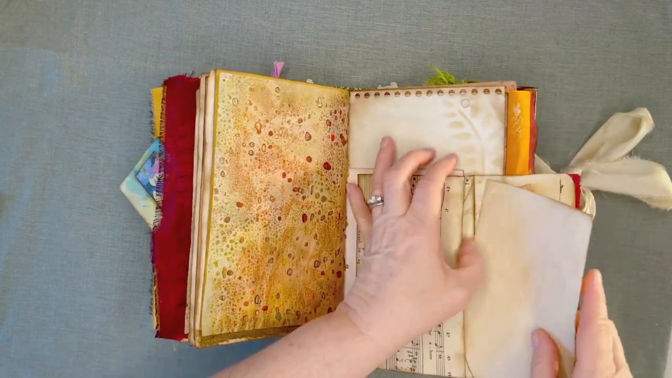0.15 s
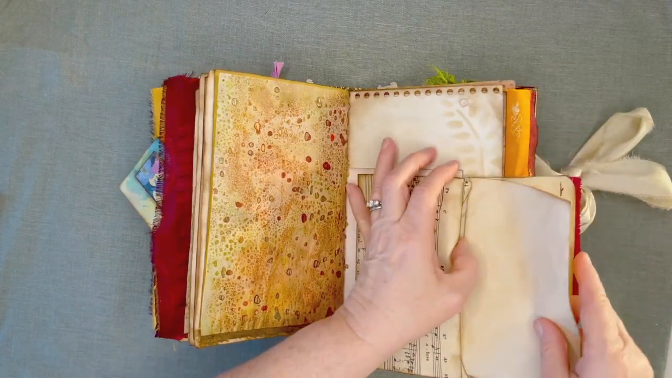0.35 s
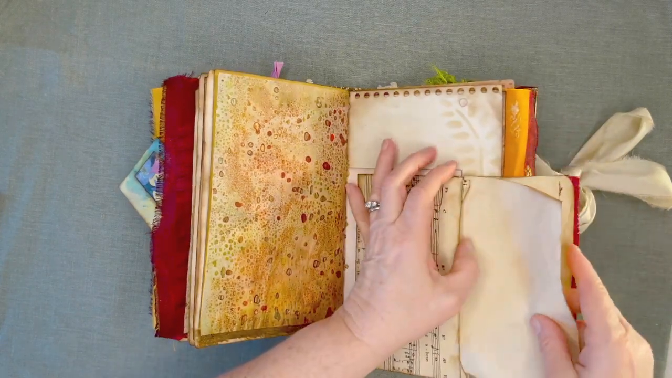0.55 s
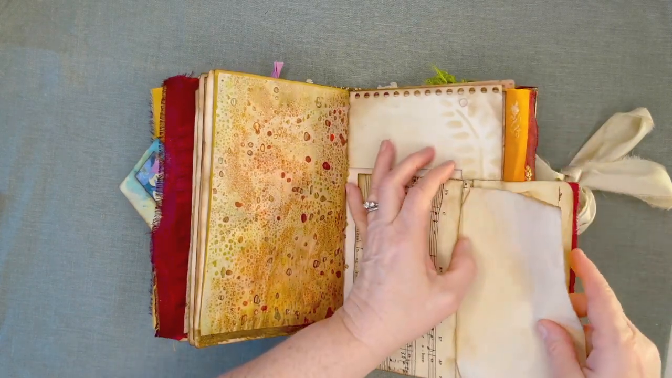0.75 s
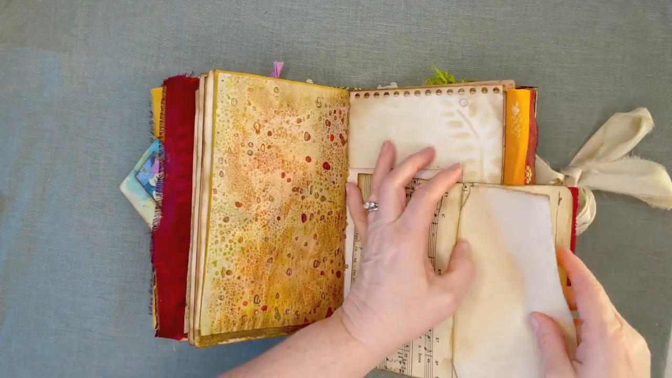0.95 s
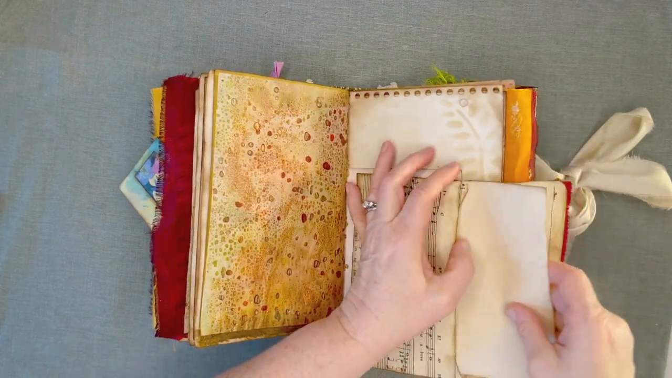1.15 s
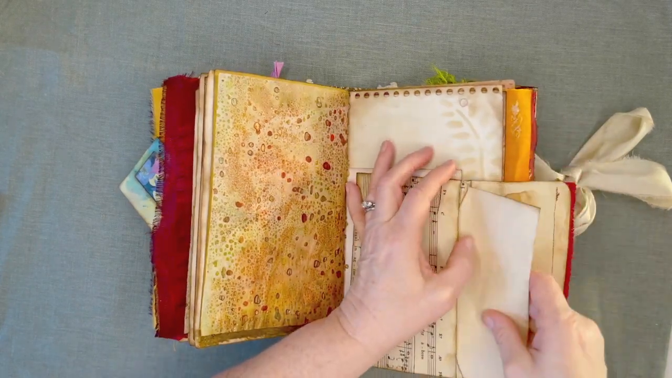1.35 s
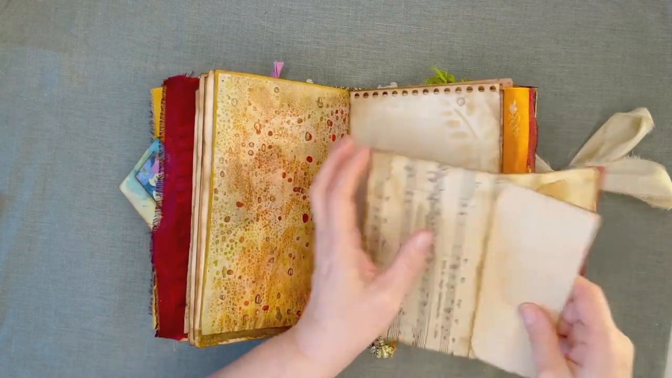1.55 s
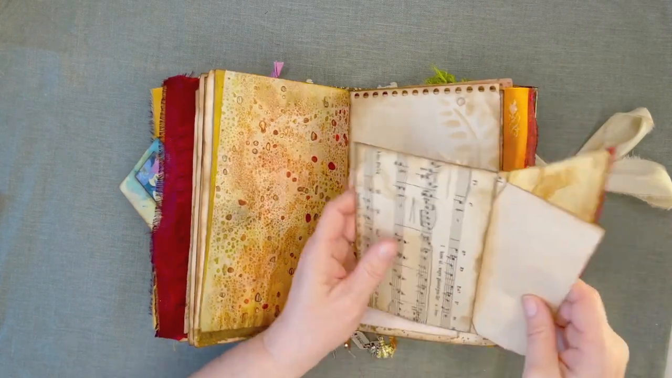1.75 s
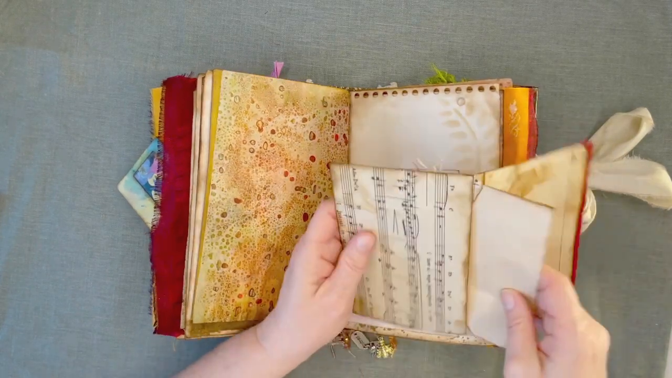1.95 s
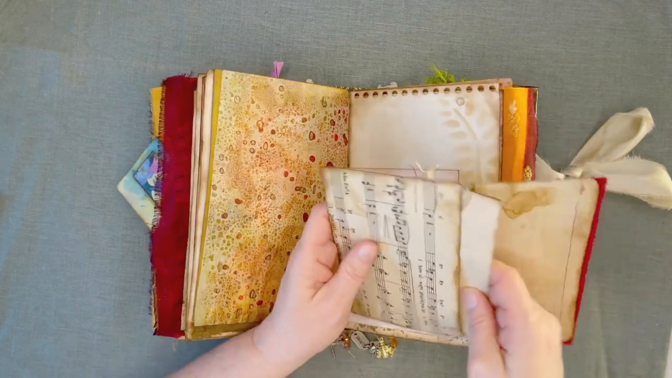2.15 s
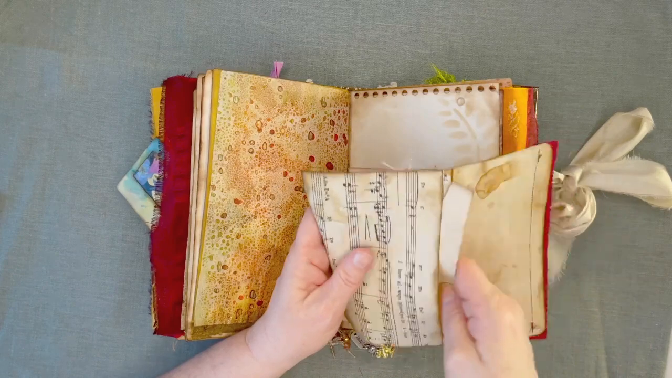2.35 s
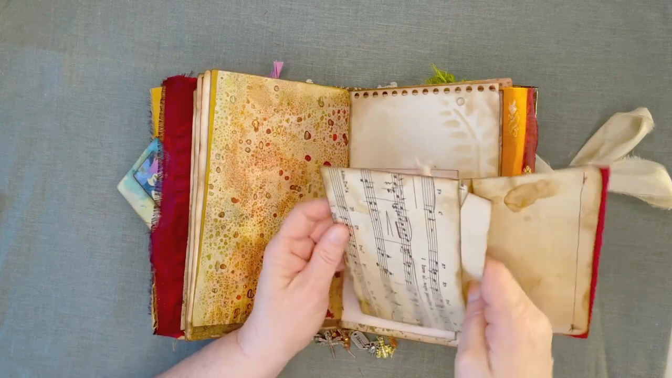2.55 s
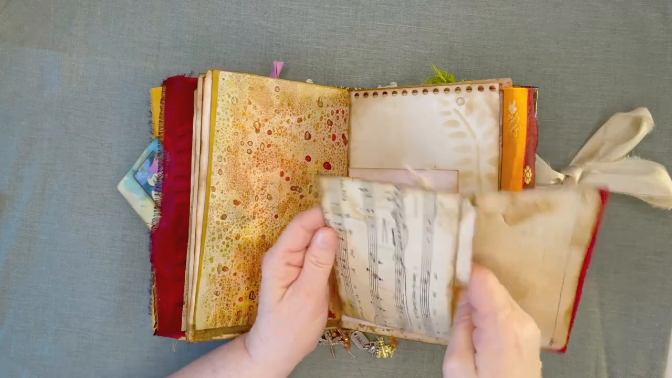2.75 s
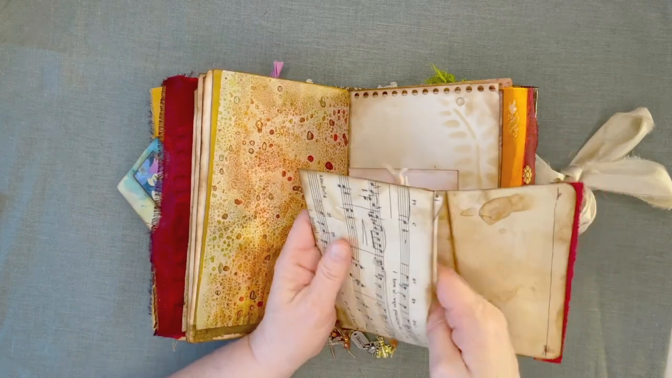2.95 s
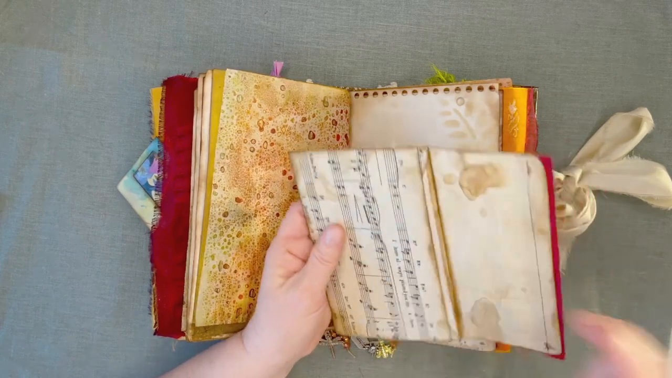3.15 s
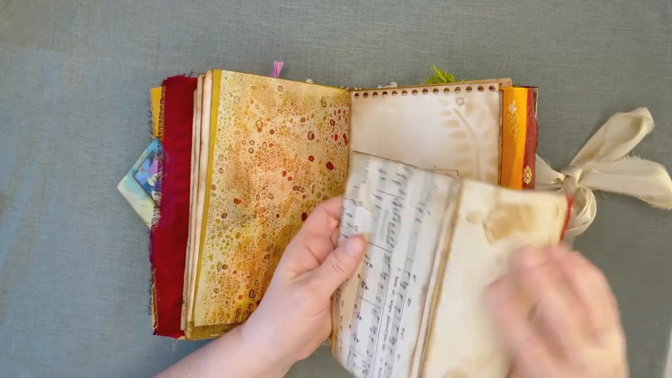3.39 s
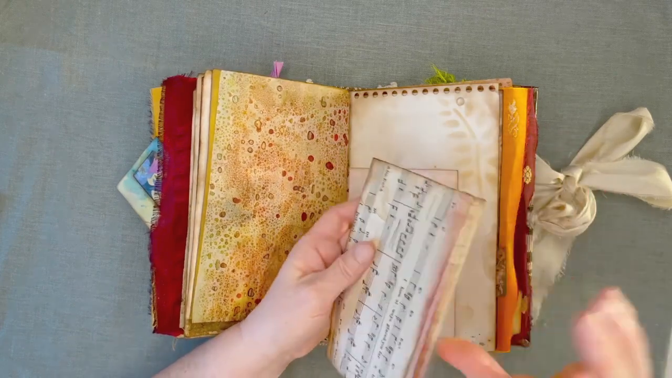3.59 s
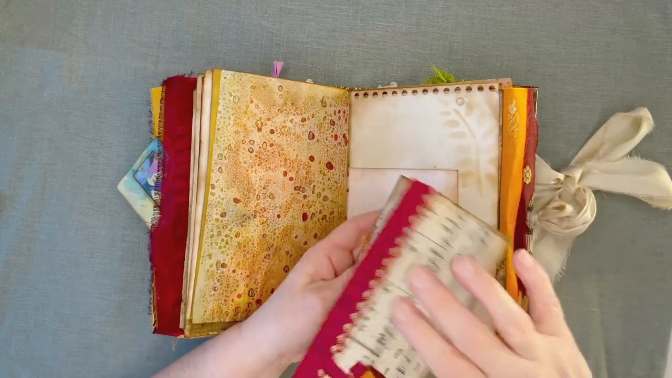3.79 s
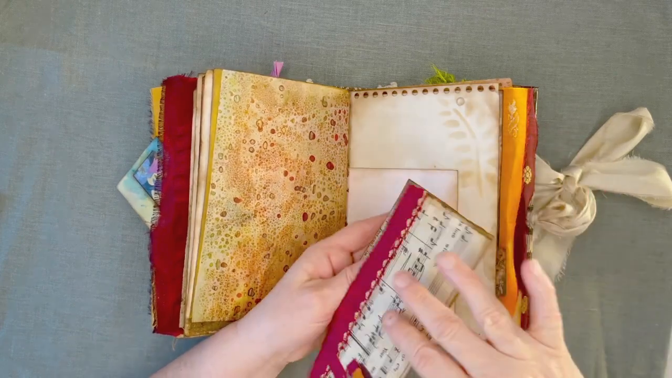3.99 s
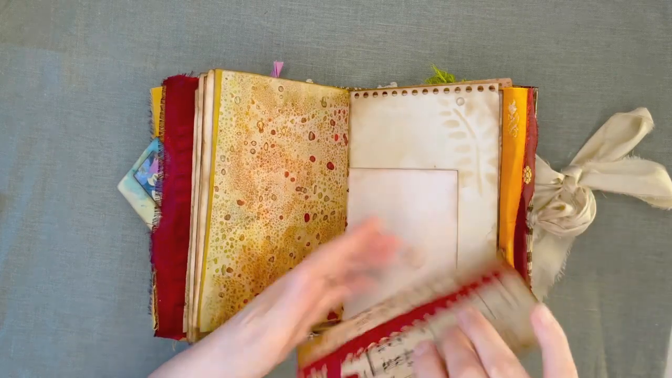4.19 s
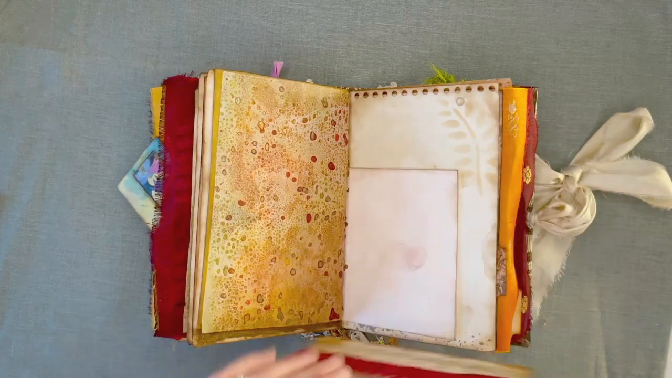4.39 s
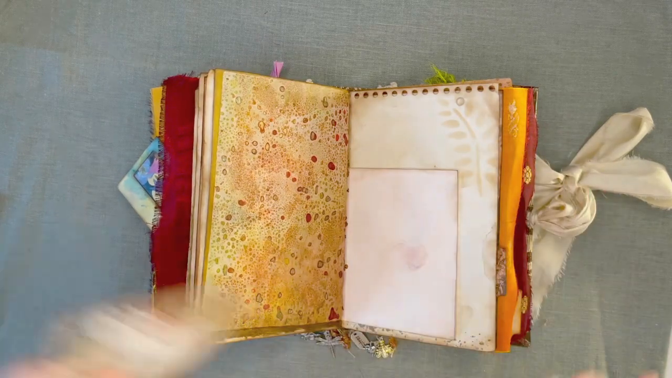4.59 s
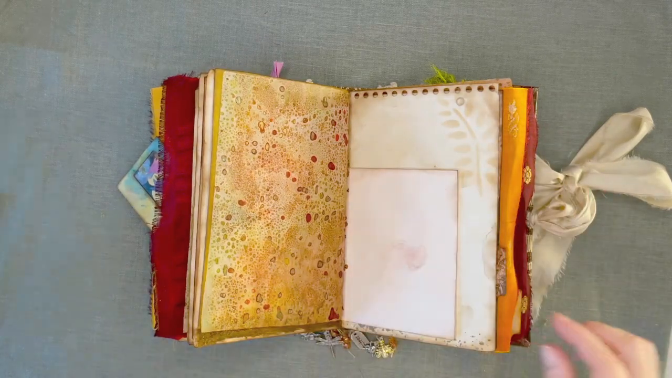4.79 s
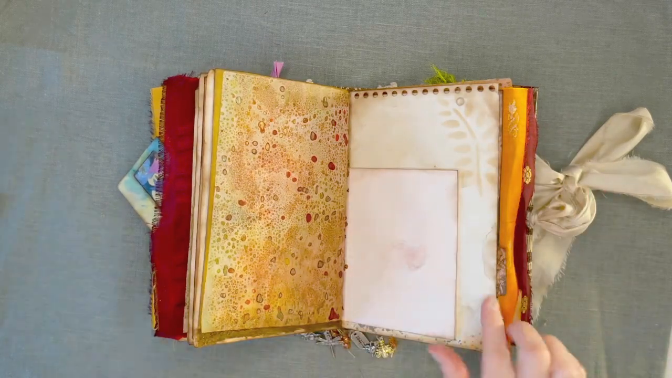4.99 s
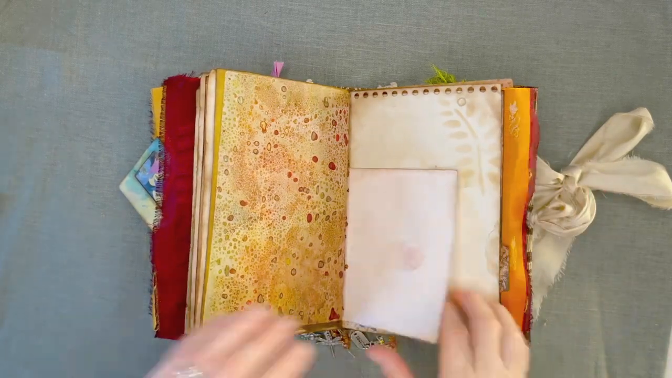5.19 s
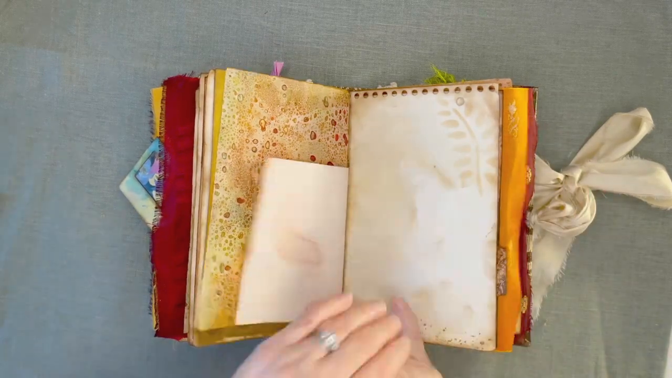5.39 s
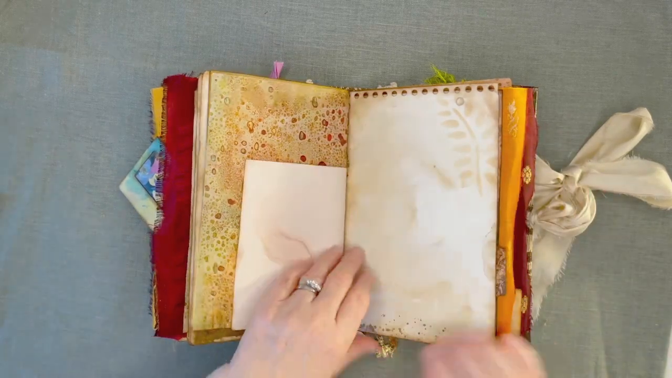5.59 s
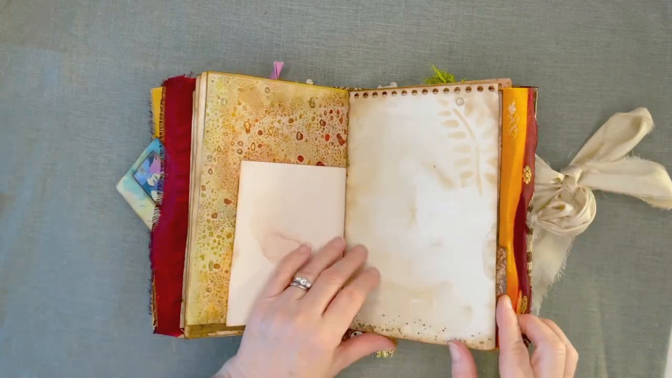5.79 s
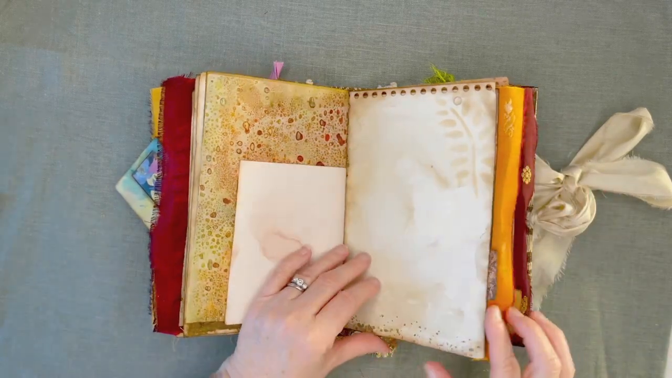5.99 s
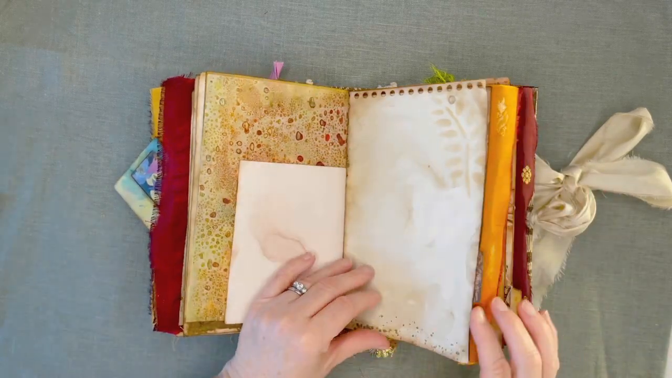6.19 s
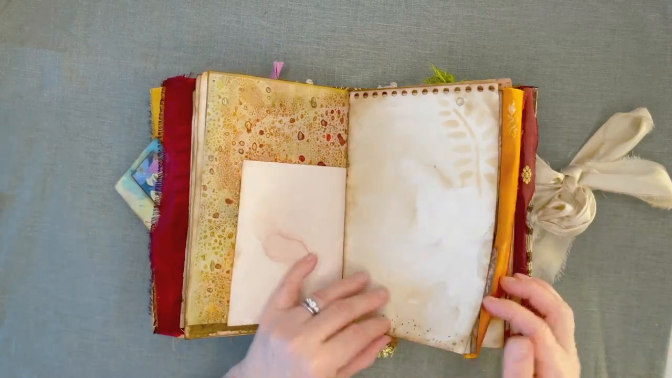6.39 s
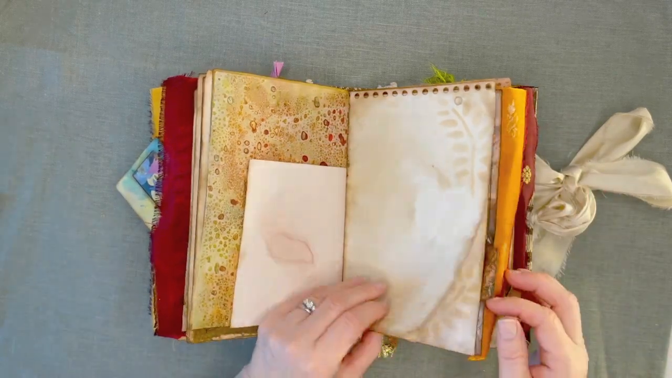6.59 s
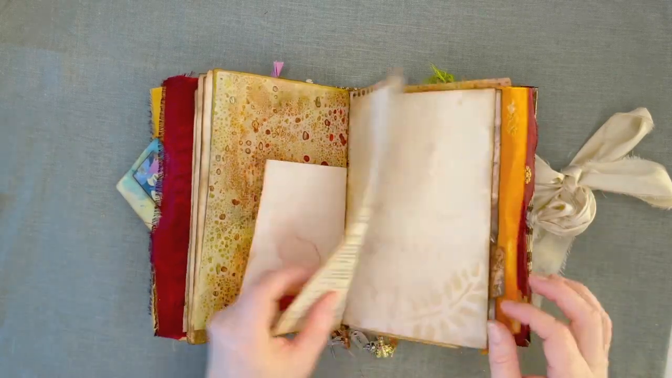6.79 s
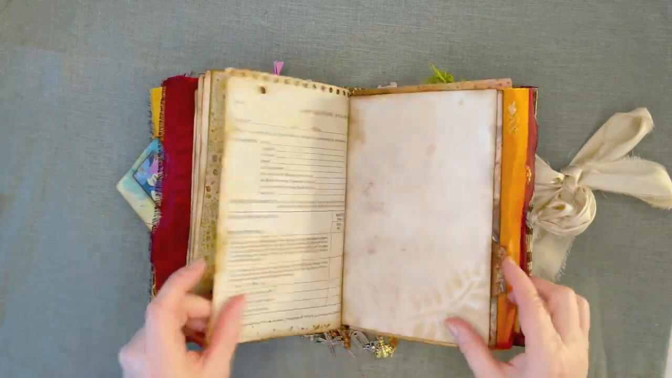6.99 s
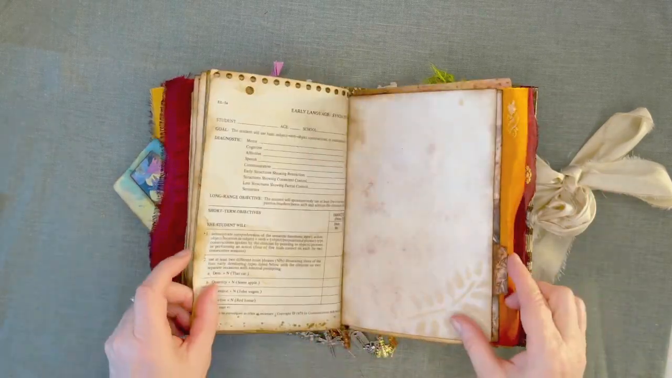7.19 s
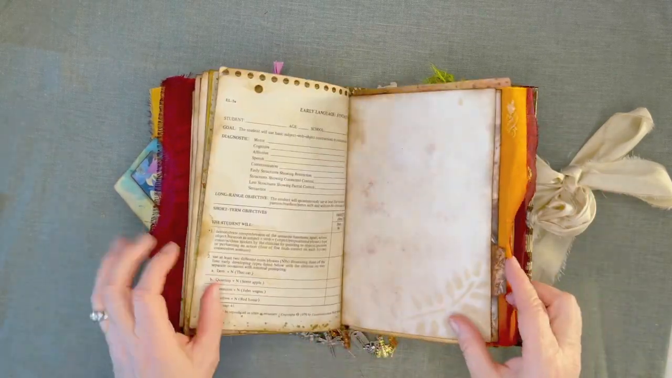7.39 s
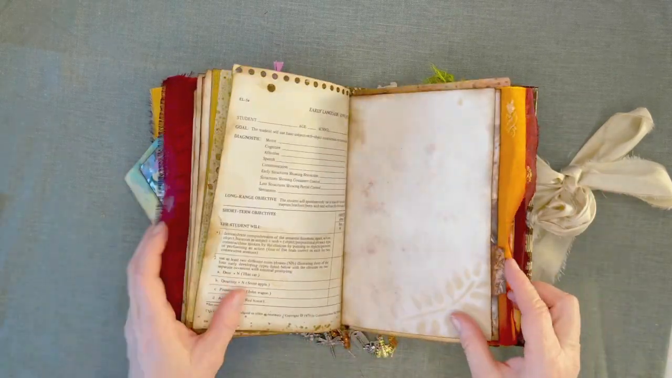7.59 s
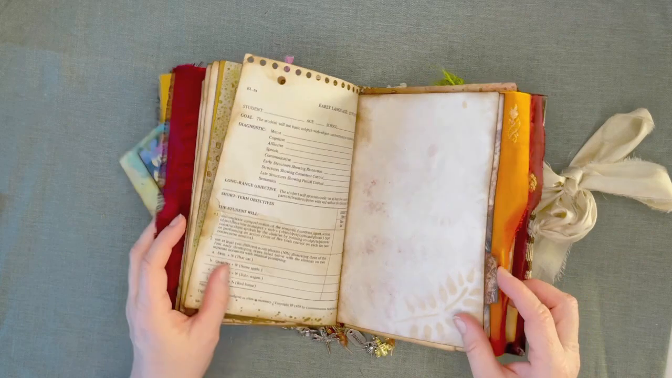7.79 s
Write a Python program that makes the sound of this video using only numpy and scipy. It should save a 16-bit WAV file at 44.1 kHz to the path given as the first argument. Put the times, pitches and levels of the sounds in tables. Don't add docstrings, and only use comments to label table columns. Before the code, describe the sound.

Close, dry stereo pickup by a table. Fingers brush paper quietly, a few creases pop, then leafing brings dense crackling, scraping and low sheet flaps. Folding rubs and snaps taper into a faint slide and near silence. Slower page turns follow, mostly soft hiss and ticks with occasional bright snaps and muted bumps. Faint low hum and slight microphone hiss sit far beneath.

```python
import sys
import numpy as np
from scipy import signal
from scipy.fft import rfft, irfft, next_fast_len
from scipy.io import wavfile
from scipy.ndimage import uniform_filter1d, map_coordinates

SR = 44100
rng = np.random.default_rng(int(sys.argv[2]) if len(sys.argv) > 2 else 0)


def makeup_ratio(level_db):
    decades = np.asarray(level_db, float) / 20
    return 10 ** decades


def master(y):
    cut = np.clip(np.atleast_2d(y).T, -1, 1)
    pcm = np.round(cut * 32767)
    wavfile.write(sys.argv[1], SR, pcm.astype(np.int16))


N = 346185

# t/s, level/dB
ROOM_LEVEL = [(0.0, -70), (0.46, -65), (0.76, -72), (1.88, -71.5), (2.05, -63), (2.53, -86), (2.8, -77),
              (3.15, -81), (4.0, -76), (4.35, -80), (5.14, -81), (5.46, -71.5), (5.88, -81.5), (6.41, -72),
              (7.39, -69.5), (7.85, -72.5)]
# f/Hz, level/dB
RUMBLE_COLOUR = [(22, -16), (40, -2), (70, 5.5), (110, 0.5), (180, -8.5), (300, -10), (500, -15)]
# f/Hz, level/dB
SELF_NOISE_COLOUR = [(300, 8.5), (800, -20), (2000, 17), (6000, -23), (13000, -16)]

# loudest t/s, edge hiss level/dB, rise/s, fall/s, sheet bend/dB
PINNING = [(0.0, -53, .05, 0.26, 5), (.195, -61.5, 0.026, 0.11, 13.5), (0.321, -51.5, 0.018, 0.033, -1),
           (0.369, -60.5, 0.22, 0.018, 8), (0.474, -58, 0.017, 0.051, 18),
           (0.636, -53.5, 0.087, 0.043, 3.5), (.73, -66, 0.34, 0.4, 7.5), (.928, -57.5, 0.34, 0.31, -5.5),
           (1.197, -57.5, 0.26, 0.25, 5), (1.377, -50.5, 0.038, 0.067, -2), (1.44, -65, 0.05, 0.059, 14),
           (1.56, -63, .12, 0.2, -3.5), (1.66, -55.5, 0.025, 0.061, 0), (1.755, -54.5, 0.037, 0.069, -2)]
# same columns, t/s, level/dB, rise/s, fall/s, bend/dB
LEAFING = [(1.923, -46.5, 0.058, 0.1, 1.5), (2.108, -47, 0.14, 0.049, -4), (2.237, -50, 0.051, 0.028, 4),
           (2.278, -50.5, 0.025, 0.038, 6), (2.396, -49, 0.072, 0.056, 6), (2.515, -51.5, 0.061, 0.076, -7),
           (2.595, -45, 0.03, 0.033, -13.5), (2.7, -42.5, 0.039, 0.044, -20.5),
           (2.806, -41, 0.089, 0.037, -21), (2.898, -52.5, 0.087, 0.12, -20), (3.006, -44, 0.057, 0.023, 4),
           (3.05, -65.5, .03, 0.17, 10)]
# t/s, level/dB, rise/s, fall/s, bend/dB
FOLDING = [
    (3.305, -53.5, 0.038, 0.028, 9.5),
    (3.381, -52, 0.022, 0.03, 0),
    (3.457, -51.5, 0.029, 0.063, -0.5),
    (3.53, -74, .05, 0.12, 8),
    (3.712, -67, .008, 0.32, -8),
    (3.756, -64.5, 0.043, 0.071, 15.5),
    (3.891, -64.5, 0.048, 0.22, -2),
    (4.05, -56.5, 0.02, 0.06, -6.5),
    (4.23, -65, 0.18, 0.25, -62),
    (4.384, -65, 0.13, 0.078, -11),
]
# t/s, level/dB, rise/s, fall/s, bend/dB
TURNING = [(4.567, -59.5, 0.075, 0.14, -55), (4.78, -59, 0.015, 0.093, -6), (4.97, -70, 0.036, 0.11, -15),
           (5.111, -60, .12, 0.24, -16), (5.297, -53.5, 0.035, 0.13, -10), (5.463, -48.5, 0.025, 0.058, 2),
           (5.56, -62.5, .1, 0.15, -16), (5.685, -61, 0.16, 0.084, -22.5),
           (5.874, -63.5, 0.055, 0.12, -3.5), (6.031, -64.5, 0.069, 0.078, 0), (6.2, -66, 0.044, 0.72, 8),
           (6.63, -56, 0.45, 0.47, -8), (6.884, -54, 0.55, 0.095, -18), (7.05, -66.5, 0.35, 0.068, 6.5),
           (7.124, -59.5, 0.031, 0.071, -1.5), (7.275, -49, 0.044, 0.026, -12.5),
           (7.394, -60.5, 0.11, 0.17, 3.5), (7.588, -60, 0.038, 0.16, 5), (7.722, -58, 0.1, 0.081, 2),
           (7.847, -60.5, 0.11, .05, 6)]
# loudest t/s, level/dB, rise/s, fall/s, sheet bend/dB
SKIMS = [
    (.1, -65, .1, 0.21, 0),
    (.92, -62, 0.21, 0.046, 1),
    (1.1, -57, .06, 0.19, 0),
    (2.1, -52.5, .05, 0.025, 0),
    (5.32, -59, .03, .06, 0),
    (5.467, -45.5, .03, .035, 0),
    (2.79, -43.5, 0.094, 0.088, 3),
    (5.095, -53, 0.015, 0.069, -9),
    (5.88, -63, 0.016, 0.026, 0),
]
# loudest t/s, level/dB, rise/s, fall/s, sheet bend/dB
GLIDES = [
    (1.39, -56, .04, .04, 0),
    (4.8, -62, .04, .05, 0),
    (5.1, -58, .02, .04, 0),
    (6.87, -54, 0.07, 0.053, 0),
    (7.135, -56, 0.043, .05, 0),
    (7.275, -47, 0.048, .02, 0),
    (7.4, -56, 0.058, 0.064, 0),
    (7.59, -60, 0.037, 0.047, 0),
]
# f/Hz, level/dB
HISS_COLOUR = [(3000, -30), (4300, -6), (5300, 0), (8200, 0), (9300, -4), (10500, -25)]
# f/Hz, level/dB
FIZZ_COLOUR = [(7800, -25), (9000, -4), (10000, 0), (16000, 0)]
# f/Hz, level/dB
SCRAPE_COLOUR = [(700, -14), (1200, -4.5), (1900, 2), (2400, 0), (2900, -2.5), (3800, 1.5), (4600, -6.5),
                 (6500, -22.5)]
# f/Hz, level/dB
FLAP_COLOUR = [(150, -19), (300, -7), (550, -6), (950, -5), (1200, -14.5), (2000, -26)]
# f/Hz, level/dB
THUD_COLOUR = [(30, -47), (60, 0.5), (150, 1.5), (260, -6), (400, -29)]
FADE_DB, ROUNDED = 15, 1.245
SCRAPE_DB, SCRAPE_PER_BEND, SCRAPE_LINGERS = 2.5, 0.16, 1.055
FLAP_LINGERS = 0.9
SKIM_HZ, SKIM_WIDTH_HZ = 3200, 2300

# t/s, peak level/dB, final pitch f/Hz
KNOCKS = [(0.114, -43, 500), (0.371, -41.5, 540), (0.504, -41, 583), (0.621, -41.5, 515), (0.793, -40, 635),
          (0.854, -41.5, 690), (0.876, -37, 653), (0.946, -42, 642), (1.021, -37, 610), (1.078, -37.5, 720),
          (1.903, -27.5, 833), (2.022, -35, 757), (2.129, -36, 880), (2.24, -33, 764), (2.268, -38, 880),
          (2.488, -30, 825), (3.016, -29, 850), (3.144, -44, 880), (3.227, -54.5, 880), (3.281, -31.5, 560),
          (3.308, -34, 580), (3.469, -36, 592), (3.521, -35, 738), (5.918, -47.5, 703), (6.198, -40.5, 696),
          (6.662, -40.5, 710), (6.75, -43, 863), (6.609, -40, 860), (7.011, -41, 520), (1.426, -42, 520),
          (1.397, -40, 480), (.472, -39, 600), (.482, -42, 600), (3.297, -33, 700), (3.447, -36, 750),
          (1.214, -41, 480), (7.288, -40.5, 910), (7.419, -47.5, 278), (7.594, -41, 910)]
# t/s, peak level/dB, final pitch f/Hz
THUMPS = [(1.479, -38, 403), (3.478, -58.5, 77), (3.72, -56, 160), (3.5, -57.5, 104), (4.372, -55, 173),
          (4.779, -65, 83), (6.925, -44.5, 229), (6.926, -39, 560), (7.004, -39, 460), (3.018, -36.5, 380),
          (7.3, -50, 340), (3.9, -48.5, 400), (1.5, -50, 260), (7.416, -48, 200)]
SHEET_HZ = [
    542,
    880,
    720,
    739,
]
BUCKLE_DB = [
    -8,
    -11,
    -11,
    -17.5,
]
BUCKLE_DB_PER_OCTAVE, SHEET_SCATTER = -1, 0.07

# t/s, peak level/dB, f/Hz
TICKS = [(0.185, -44, 748), (0.227, -46, 2150), (0.314, -34, 3340), (0.36, -38, 3600), (.486, -36, 3700),
         (.117, -40, 1700), (3.369, -36, 1800), (2.999, -29, 3500), (0.563, -48, 1910), (0.633, -38.5, 743),
         (0.859, -37.5, 756), (0.961, -44, 740), (1.22, -42, 3440), (1.643, -45, 2140), (1.658, -47, 1910),
         (1.742, -48, 1810), (1.805, -43, 1090), (1.86, -43, 5510), (1.911, -30, 891), (2.21, -33, 1130),
         (2.226, -27, 1900), (2.236, -26.5, 1070), (2.401, -22, 2620), (2.467, -41, 1030),
         (2.51, -35, 2010), (2.565, -38, 3080), (2.585, -38, 3760), (2.672, -32, 3590), (2.696, -35, 2600),
         (2.743, -33, 4200), (2.754, -30, 4050), (3.01, -27.5, 1080), (3.019, -32, 797), (3.057, -40, 1090),
         (3.077, -44.5, 899), (3.135, -53, 2720), (3.15, -44, 1020), (3.164, -52, 1790), (3.229, -56, 915),
         (3.385, -33, 1920), (3.471, -38, 703), (3.784, -46, 1820), (3.858, -49, 1720), (3.894, -39, 1950),
         (3.999, -52, 2580), (4.554, -52, 5880), (4.781, -51, 5500), (4.846, -51, 3950), (4.926, -57, 1870),
         (4.958, -58, 2960)]
# t/s, peak level/dB, f/Hz
PAGE_TICKS = [(5.064, -55, 3110), (5.082, -45, 3630), (5.102, -43, 3570), (5.114, -40, 3660),
              (5.233, -46, 3790), (5.61, -42, 2280), (5.68, -46, 1910), (5.847, -49, 1950),
              (5.865, -47, 3730), (5.883, -43, 3880), (5.913, -41, 1840), (6.154, -53, 1780),
              (6.286, -49, 2470), (6.34, -46, 1930), (6.578, -35, 1920), (6.862, -42, 5980),
              (7.232, -47, 1810), (7.242, -43, 2840), (7.263, -38, 5750), (7.309, -45, 703),
              (7.561, -42, 1480), (7.585, -41, 1790), (7.599, -42, 821), (7.611, -38, 2600),
              (7.74, -38, 2270)]
# t/s, peak level/dB, f/Hz
MORE_TICKS = [(1.2005, -30, 1900), (2.380, -33, 1800), (2.420, -33, 1500), (5.290, -40, 2500),
              (5.308, -30, 2900), (7.010, -38, 1000), (4.162, -52, 1300), (4.18, -55, 600),
              (4.836, -56, 900), (3.142, -50, 600), (3.042, -42, 900), (3.088, -46, 1900), (7.45, -50, 620),
              (3.703, -30, 2100), (4.373, -42, 1100), (4.36, -50, 1900), (3.735, -40, 1880),
              (3.362, -40, 940), (5.453, -29, 2500), (3.268, -36, 700), (3.288, -36, 600),
              (4.058, -48, 2500), (1.0, -48, 1500), (0.912, -46, 700), (1.112, -46, 800)]
# t/s, peak level/dB, f/Hz, time to fade by 60 dB/s
RINGS = [
    (6.752, -48, 855, .12),
    (3.566, -53, 1230, .06),
    (3.701, -39, 1600, .03),
    (5.306, -39, 1900, .025),
    (3.262, -40, 870, .06),
]
TICK_DB, TICK_CYCLES = -4, 1.5
TICK_WIDTH, TICK_DROP, TICK_ROUGH = 1.2, 1.2, .7

# t/s, peak level/dB, sheet ring f/Hz, bright crack beside it/dB
PINNED_SNAPS = [(0.4405, -45, 2070, -28), (0.4648, -34, 1470, -13), (0.5046, -39, 1790, -21),
                (1.162, -23.5, 1350, -17), (1.1807, -32, 1450, -22), (1.1941, -28, 1710, -17),
                (1.2864, -46, 4110, 5), (1.3279, -24.5, 3200, -31), (1.3721, -38, 1970, -2),
                (1.394, -33.5, 2020, -2), (1.479, -30.5, 1150, -10)]
# t/s, peak level/dB, sheet ring f/Hz, bright crack/dB
LEAF_SNAPS = [ (2.1848, -23.5, 1430, -31), (2.2, -32, 1090, -29), (2.2666, -25, 2230, -21),
              (2.2769, -22.5, 3560, -27), (2.3422, -30.5, 2460, -15.5), (2.363, -24.5, 1070, -21),
              (2.391, -22.5, 1560, -4), (2.41, -23, 2490, -11), (2.4794, -30, 1010, -22),
              (2.49, -33.5, 1100, -23), (2.8382, -30, 2140, -21), (2.9487, -32, 1900, -9),
              (2.975, -20, 1890, -15), (2.9911, -22.5, 1940, -14), (2.998, -26.5, 1040, 15), ]
# t/s, peak level/dB, sheet ring f/Hz, bright crack/dB
FOLD_SNAPS = [(3.259, -30.5, 910, -31), (3.2806, -34, 1080, -1), (3.2961, -24.5, 1960, -19),
              (3.379, -30, 1660, -4.5), (3.4445, -30, 1800, -14), (3.5027, -31, 1640, -30),
              (3.5254, -30, 1220, -37), (3.7, -25, 1890, -8.5), (3.7538, -25, 1700, -30),
              (3.8898, -35.5, 1600, -22), (3.899, -39, 1400, -7), (3.9174, -51, 4030, -9),
              (4.042, -57, 2940, -2), (4.1606, -47, 2520, -14), (4.1986, -48, 2000, 1),
              (4.3799, -37.5, 1260, -2.5), ]
# t/s, peak level/dB, sheet ring f/Hz, bright crack/dB
PAGE_SNAPS = [(4.7662, -42, 1900, -1), (4.836, -52, 1480, -22), (5.095, -42, 3900, 1),
              (5.2813, -42, 2570, -12), (5.305, -25, 2780, -7.5), (5.392, -39, 3160, -2),
              (5.4435, -31, 2700, -10), (5.464, -22.5, 2500, -25), (5.6803, -43, 2000, -8),
              (6.028, -46.5, 2030, 1), (6.1988, -38, 980, 4), (6.6061, -23.5, 2830, -14),
              (6.75, -39, 1680, -6), (6.9288, -33, 1560, -22), (7.003, -33.5, 1550, -28),
              (7.0468, -27.5, 2230, -13), (7.419, -38, 890, -21), (7.6332, -27, 2070, -20),
              (7.8204, -30, 2470, -3)]
CREEP_S, CREEP_DB = 0.0035, -21

# f/Hz, width/Hz, share taken away (0-1)
HAND_DIPS = [
    (1320, 600, .7),
    (2750, 800, .7),
    (6300, 3500, .3),
]
HAND_LIFTS_S, HAND_LIFT_TAKES_S = 1.55, .1

# f/Hz, angle/rad
LEAD = [(300, -.1), (1100, -.5), (1460, 0), (2000, 0), (2400, .5), (3200, -.3), (4450, .6), (4850, 3.14),
        (5450, 6.28), (6150, 6.28), (8750, 9.42), (9350, 9.42), (11300, 11.5), (12050, 12.57)]
# f/Hz, likeness (0-1)
ALIKE = [(60, .985), (300, .87), (1100, .9), (1500, 1), (2050, 1), (2600, .88), (4200, .6), (4900, .99),
         (6000, 1), (7600, .8), (8750, 1), (9350, 1), (10600, .82), (12000, .98), (13800, .2)]
# f/Hz, level/dB
TILT = [(2100, 0), (2600, 2), (3000, -1.5), (4000, -4.5), (5000, 0)]
# f/Hz, level/dB
MIC_TOP = [(11000, 0.5), (12000, -9.5), (13000, -14), (14200, -18), (15700, -21), (15900, -88)]


def unit(x):
    return x / np.sqrt(np.mean(x ** 2) + 1e-20)


def along(points, hz):
    f, value = np.transpose(points)
    return np.interp(np.log(hz + 1), np.log(f + 1), value)


def wobble(rate):
    knots = rng.standard_normal(int(N * rate / SR) + 4)
    return map_coordinates(knots, [np.arange(N) * rate / SR])


def filtered(x, response):
    length = x.shape[-1]
    padded = next_fast_len(length + min(8192, length // 2))
    spectrum = rfft(x, padded) * response(np.fft.rfftfreq(padded, 1 / SR))
    return irfft(spectrum, padded)[..., :length]


def coloured(x, spectrum):
    closed = [(5, -120)] + spectrum + [(22050, -120)]
    return unit(filtered(x, lambda hz: makeup_ratio(along(closed, hz))))


def resonance(x, centre_hz, width_hz):
    return filtered(x, lambda f: 1j * f * width_hz / (centre_hz ** 2 - f * f + 1j * f * width_hz))


def swell(t, peak_s):
    return t / peak_s * np.exp(1 - t / peak_s)


def add(track, s, db, sound):
    place = track[:, round(s * SR):][:, :sound.shape[1]]
    place += makeup_ratio(db) * sound / np.abs(sound[0]).max()


def room_tone():
    t = np.arange(N) / SR
    level_db = np.interp(t, *np.transpose(ROOM_LEVEL))
    unsteady_db = 3 * wobble(12)
    hum = makeup_ratio(level_db - 3 + unsteady_db) * np.sin(2 * np.pi * 120 * t + 0.9 * wobble(27))
    rumble_noise = coloured(rng.standard_normal((2, N)), RUMBLE_COLOUR)
    rumble = makeup_ratio(level_db - 4.5 + 0.67 * wobble(9.1)) * rumble_noise
    self_noise = makeup_ratio(-82.5) * coloured(rng.standard_normal((2, N)), SELF_NOISE_COLOUR)
    return hum * [[1], [0]] + rumble + self_noise


def strokes(rows, over_db=0, per_bend=0, lingers=1):
    s, db, rise, fall, bend_db = np.transpose(rows)[:, :, None]
    t = np.arange(0, N, 88) / SR
    away = np.where(t < s, (s - t) / rise, (t - s) / fall) / lingers
    stroke_db = db + over_db + per_bend * bend_db - FADE_DB * away ** ROUNDED
    power = makeup_ratio(2 * stroke_db).sum(axis=0)
    return np.interp(np.arange(N) / SR, t, 10 * np.log10(power + 1e-15))


def fibres(per_second, spread_db, life_s):
    strength = makeup_ratio(spread_db * np.minimum(rng.exponential(size=N), 2.2))
    catches = (rng.random(N) < per_second / SR) * strength
    fade = np.exp(-1 / (life_s * SR))
    return unit(signal.lfilter([1], [1, -2 * fade, fade ** 2], catches))


def patchy(x, depth_db):
    z = signal.stft(x, nperseg=512)[2]
    field = uniform_filter1d(rng.standard_normal(z.shape[1:]), size=9, axis=0)
    field = uniform_filter1d(field, size=16, axis=1)
    return signal.istft(z * makeup_ratio(depth_db * unit(field)), nperseg=512)[1][:, :N]


def rubbing():
    rows = PINNING + LEAFING + FOLDING + TURNING
    hiss_db = strokes(rows)
    scrape_db = strokes(rows, SCRAPE_DB, SCRAPE_PER_BEND, SCRAPE_LINGERS)
    flap_db = strokes(rows, 0, 0.84, FLAP_LINGERS)
    catches = fibres(per_second=170, spread_db=3.0, life_s=0.0008)
    pressure = wobble(35)

    def noise(grain):
        return patchy(rng.standard_normal((2, N)), depth_db=2) * (1 + grain * catches)

    edge = noise(grain=0.1)
    hiss = makeup_ratio(hiss_db + 1.5 + pressure + 1.58 * wobble(90)) * coloured(edge, HISS_COLOUR)
    glide = makeup_ratio(strokes(GLIDES) + pressure) * coloured(noise(grain=0.28), HISS_COLOUR)
    fizz_db = hiss_db + 4.5 + 1.6 * pressure + 1.4 * wobble(60) + 1.1 * wobble(5.4)
    fizz = makeup_ratio(fizz_db) * coloured(edge, FIZZ_COLOUR)

    grainy = noise(grain=0.42)
    scrape = makeup_ratio(scrape_db - 1.17 + 0.52 * pressure) * coloured(grainy, SCRAPE_COLOUR)
    corner = resonance(grainy, SKIM_HZ, SKIM_WIDTH_HZ)
    corner = unit(resonance(corner, SKIM_HZ, SKIM_WIDTH_HZ))
    skim = makeup_ratio(strokes(SKIMS) + pressure) * corner

    flap = makeup_ratio(flap_db - 5 + pressure) * coloured(noise(grain=0.61), FLAP_COLOUR)
    thud_db = 0.63 * flap_db - 42 + 4.3 * wobble(8.1)
    thud = makeup_ratio(thud_db) * coloured(rng.standard_normal((2, N)), THUD_COLOUR)
    return hiss + glide + fizz + scrape + skim + thud, flap


def buckles():
    bends = []
    snap_tables = [PINNED_SNAPS, LEAF_SNAPS, FOLD_SNAPS, PAGE_SNAPS]
    for rows, sheet_hz, under_db in zip(snap_tables, SHEET_HZ, BUCKLE_DB):
        for s, db, ring_hz, _ in rows:
            bend_db = db + under_db + BUCKLE_DB_PER_OCTAVE * np.log2(ring_hz / 1500)
            bends.append((s, bend_db, sheet_hz * np.exp(rng.normal(0, SHEET_SCATTER))))
    return bends


def knocks():
    out, t = np.zeros((2, N + SR)), np.arange(4400) / SR
    for s, db, final_hz in [*KNOCKS, *THUMPS, *buckles()]:
        fall_hz = final_hz * (0.871 + 1.407 * np.exp(-t / 0.0014))
        start_phase = rng.uniform(0, 2 * np.pi, (2, 1))
        wave = np.sin(2 * np.pi * np.cumsum(fall_hz) / SR + start_phase)
        rattle = resonance(rng.standard_normal((2, len(t))), final_hz, final_hz)
        rattle = unit(resonance(rattle, 1.5 * final_hz, 2.4 * final_hz))
        add(out, s + .0015, db - 2.2, (wave + .6 * rattle) * swell(t, 1.4 / final_hz))
    return out[:, :N]


def ticks():
    out, t = np.zeros((2, N + SR)), np.arange(700) / SR
    s, db, hz = np.transpose([*TICKS, *PAGE_TICKS, *MORE_TICKS])[:, :, None, None]
    life_s = TICK_CYCLES / np.sqrt(hz * 2000)
    falling_hz = hz * (.8 + TICK_DROP * np.exp(-t / life_s))
    start_phase = rng.uniform(0, 2 * np.pi, (len(s), 2, 1))
    wave = np.sin(2 * np.pi * np.cumsum(falling_hz, axis=2) / SR + start_phase)
    rough = resonance(rng.standard_normal((len(s), 2, len(t))), hz, TICK_WIDTH * hz)
    rough = rough * np.sqrt(12000 / hz)
    sounds = resonance((wave + TICK_ROUGH * rough) * swell(t, life_s), hz, 2.2 * hz)
    for at_s, level_db, sound in zip(s.ravel(), db.ravel(), sounds):
        add(out, at_s - .001, level_db + TICK_DB, sound)

    t = np.arange(6000) / SR
    for at_s, level_db, ring_hz, t60 in RINGS:
        fade = makeup_ratio(-60 * t / t60) * (1 - np.exp(-t / .001))
        add(out, at_s, level_db, [[1], [.5]] * np.sin(2 * np.pi * ring_hz * t) * fade)
    return out[:, :N]


def snaps():
    out, lead = np.zeros((2, N + SR)), 400
    t = (np.arange(1300) - lead) / SR
    after = np.maximum(t, 0)
    s, db, ring_hz, crack_db = np.transpose(PINNED_SNAPS + LEAF_SNAPS + FOLD_SNAPS + PAGE_SNAPS)
    sheet_hz = ring_hz[:, None, None]
    burst = rng.standard_normal((2, len(s), 2, len(t)))

    creep = makeup_ratio(CREEP_DB) * np.exp(-np.abs(t) / CREEP_S)
    click = 2.5 * (t == 0) * [[1], [.3]]
    wide = resonance(burst[0] * (creep + swell(after, 0.0008)) + click, 2250, 3300)
    wide = resonance(wide, 62 * np.sqrt(sheet_hz) - 700, 2600)
    ring = resonance(wide, sheet_hz, 0.5 * sheet_hz)
    crack = resonance(burst[1] * swell(after, 0.0006), 8000, 7200)
    crack = resonance(crack, 7700, 7000)
    for k, start_s in enumerate(s + .0008 - lead / SR):
        add(out, start_s, db[k] - 7.5, ring[k])
        add(out, start_s, db[k] - 9.5, wide[k])
        add(out, start_s, db[k] + min(crack_db[k], 1) + 3, crack[k])
    return out[:, :N]


def under_hand(x):
    hollow = x
    for hz, width_hz, share in HAND_DIPS:
        hollow = hollow - share * resonance(hollow, hz, width_hz)
    lifted = np.clip((np.arange(N) / SR - HAND_LIFTS_S) / HAND_LIFT_TAKES_S, 0, 1)
    return lifted * x + (1 - lifted) * makeup_ratio(.6) * hollow


def walls(x, t60, level_db):
    t = np.arange(SR // 4) / SR
    tail = resonance(rng.standard_normal((2, len(t))) * makeup_ratio(-60 * t / t60), 2380, 3600)
    tail = tail / np.linalg.norm(tail[0])
    late = np.pad(x, ((0, 0), (120, 0)))
    return makeup_ratio(level_db) * signal.fftconvolve(late, tail, axes=1)[:, :N]


def ports(pair):
    def split(hz):
        turn = np.arccos(np.clip(along(ALIKE, hz), 0, 1)) / 2
        return np.array([np.cos(turn), np.sin(turn)])

    shared, apart = filtered(pair, split)
    side = np.array([[1], [-1]])

    def difference(hz):
        return makeup_ratio(side * along(TILT, hz) / 2) * np.exp(side * .5j * along(LEAD, hz))

    return filtered(shared + side * apart, difference)


def scene():
    bright, flap = rubbing()
    crisp, dull = snaps() + ticks(), knocks()
    high = under_hand(bright) + crisp + walls(crisp, t60=0.093, level_db=-16.5)
    low = flap + dull + walls(dull, t60=0.17, level_db=-8.5)
    return ports(high + room_tone()) + ports(low) * makeup_ratio([[2.2], [-2.4]])


def drop_weak_bands(x, below_db, follow, scatter_db, size=16):
    window, lead = np.sqrt(np.hanning(2049)[:-1]), 1024 - 199
    pair = np.array([x[0] + x[1], x[0] - x[1]]) / 2
    pair = np.pad(pair, ((0, 0), (lead, 0)))
    hz, _, z = signal.stft(pair, SR, nperseg=len(window), window=window)
    power = np.abs(z[:, :-1].reshape(2, -1, size, z.shape[-1])) ** 2
    bands = np.mean(power, axis=2)
    frame = bands[:, 2:33].sum(axis=0).mean(axis=0)
    limit = frame * (frame / np.median(frame)) ** (follow - 1)
    chance = uniform_filter1d(rng.standard_normal(bands.shape[1:]), size=3, axis=0)
    threshold_db = along(below_db, hz[:-1:size])[:, None] + scatter_db * chance
    keep = bands > limit * makeup_ratio(2 * threshold_db)
    keep[:, :, 1:] |= frame[1:] > 12 * frame[:-1]
    z[:, :-1] *= np.repeat(keep, size, axis=1)
    mid, side = signal.istft(z, nperseg=len(window), window=window)[1][:, lead:][:, :N]
    return np.array([mid + side, mid - side])


def low_pass(x):
    return signal.sosfilt(signal.butter(12, 15690, fs=SR, output="sos"), x)


def record(dry):
    heard = filtered(dry, lambda hz: makeup_ratio(along(MIC_TOP, hz)))
    below_db = [(1000, -60), (1500, -22), (8000, -14)]  # f/Hz, level/dB
    mix = drop_weak_bands(heard, below_db, follow=.78, scatter_db=4)
    return low_pass(mix)


dry = scene()
out = record(dry)
master(out)
```